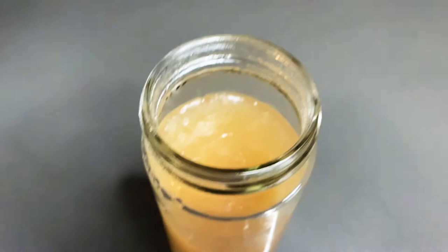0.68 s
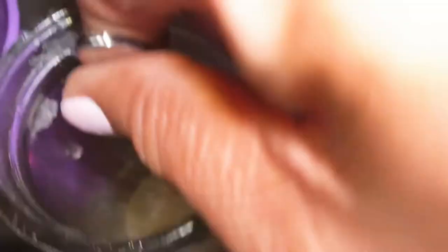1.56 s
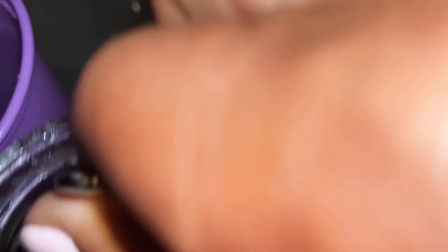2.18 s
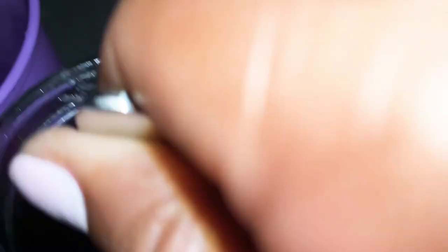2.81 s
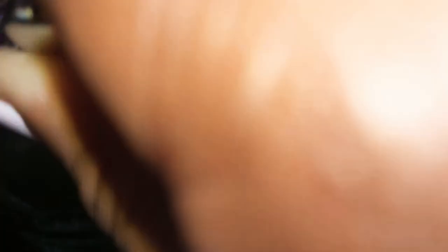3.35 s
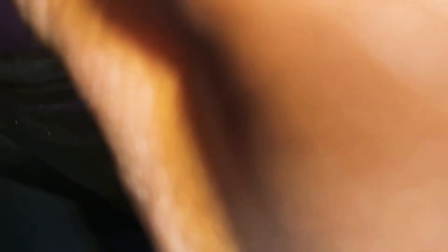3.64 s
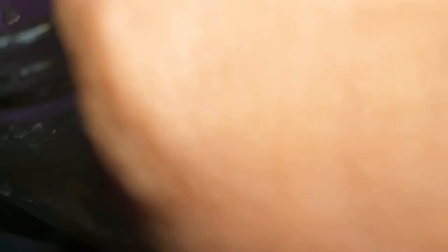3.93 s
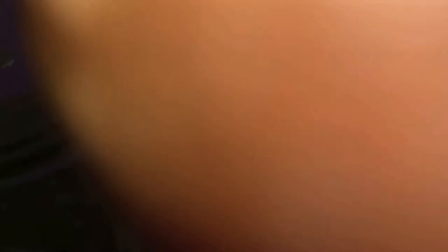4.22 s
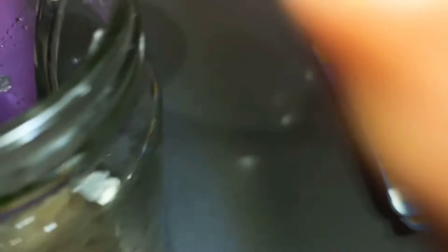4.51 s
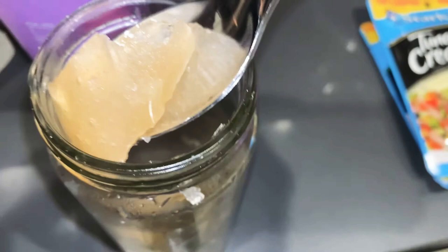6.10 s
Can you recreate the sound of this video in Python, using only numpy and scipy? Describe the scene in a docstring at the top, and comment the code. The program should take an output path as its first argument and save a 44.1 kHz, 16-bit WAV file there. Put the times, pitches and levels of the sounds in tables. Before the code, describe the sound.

Close up in a quiet kitchen, fingers brush a glass jar and a metal spoon clinks lightly against it. The spoon works through thick gel with dull, hollow knocks, short rubs and small sticky snaps. One low thump comes midway, followed by a brighter run of ringing clinks and gritty scrapes on the glass. It settles into a few faint taps over a low room rumble.

```python
"""A metal spoon scoops thick gel out of a glass jar, close by in a quiet kitchen.
Fingers brush the jar, then the spoon goes in with a few light clinks. Cushioned knocks and rubs
wake the hollow note of the air inside, and the gel crackles as it pulls apart. Midway comes one
soft low thump. From about 4 s bare metal clinks and scrapes on the glass, setting it ringing.
It ends with a few faint finger taps and a last snap of gel over the low rumble of the room."""
import sys
import numpy as np
from scipy import signal
from scipy.fft import rfft, irfft
from scipy.io import wavfile
from scipy.ndimage import uniform_filter1d, map_coordinates

SR = 44100
rng = np.random.default_rng(int(sys.argv[2]) if len(sys.argv) > 2 else 0)


def unload_wav(signal):
    """Save mono or channel-first audio to the path in sys.argv[1] as 16-bit WAV at rate SR, clipped to [-1, 1]."""
    wavfile.write(
        sys.argv[1],
        SR,
        np.round(np.clip(np.atleast_2d(signal).T, -1, 1) * 32767).astype(np.int16),
    )


N = 294806

# dull body tone of the jar: freq_hz, level_db
JAR_BODY = [(40, -27), (150, -19.5), (270, -15), (360, -10), (435, 4.5), (510, -1.5), (600, -0.5),
            (690, -8.5), (880, -7.5), (1100, -17.5), (1450, -18), (2100, -33), (3000, -36), (8000, -66.5)]
# lesser resonances of the air in the jar: freq_hz, width_hz, lift_db
AIR_PEAKS = [(585, 57, 1), (754, 27, 5), (828, 6.6, 3), (1190, 17, 8), (1443.5, 60, 1.5)]


def knocks(note_db=1, thud_db=2, air_t60_s=0.17):
    """A soft push swells the jar's hollow note, which dies away; a thud and a low bump come with it."""
    # cushioned knocks: start_s, note_level_db, thud_level_db, push_s, thud_tilt_db_per_octave
    hits = [(1.2115, -31, -34.5, 0.022, -.5), (1.2945, -40.5, -38.5, 0.031, -5),
            (1.419, -47, -33, 0.024, 5.5), (1.835, -20.5, -43.5, 0.034, -4), (1.874, -9.5, -23, 0.02, 1),
            (1.935, -17, -33, 0.0062, 3.5), (1.975, -20.5, -37.5, 0.0072, 3), (2.254, -27, -39, 0.016, -9),
            (2.291, -32.5, -32.5, 0.0053, -6.5), (2.435, -33.5, -36, 0.025, -11.5),
            (2.493, -31, -43, 0.0035, -11), (3.569, -28.5, -15.5, 0.0068, 2.5),
            (3.733, -27.5, -33.5, 0.013, -6.5), (3.847, -54, -47, 0.0091, 2.5),
            (4.0725, -39, -27, 0.011, 2), (4.101, -29, -21.5, 0.009, 1.5), (4.3736, -22, -24, 0.02, -1.5),
            (4.552, -30.5, -35, 0.018, .5), (4.6305, -17, -17.5, 0.023, 1), (4.867, -41, -46.5, 0.033, 2)]
    # the hollow note moves as spoon and hand fill the mouth of the jar: time_s, pitch_hz
    air_pitch = [(1.3, 450.7), (2.0, 431.2), (3.75, 440.4), (4.12, 453.8), (4.42, 443.3), (4.65, 420),
                 (4.9, 426)]
    # the low bump under each knock is stronger in the second half: time_s, bump_offset_db
    bump_curve = [(2.5, -21.5), (3.5, -15)]
    swell, thuds, t = np.zeros(N), np.zeros(N), np.arange(SR // 2) / SR
    bump = thump(start_hz=290, end_hz=50, glide_s=.014, peak_s=0.016)
    for s, air_db, db, push_s, tilt_db in hits:
        push = np.sin(np.pi * np.minimum(t / push_s, 1))
        envelope = signal.fftconvolve(push, np.exp(-np.log(1000) * t / air_t60_s))[:len(t)]
        add(swell, s, amp(air_db + note_db) * envelope / envelope.max())
        thud = crest(colour(burst(t, 0.94 * push_s), JAR_BODY, AIR_PEAKS, tilt_db))
        bump_db = db + np.interp(s, *np.transpose(bump_curve))
        add(thuds, s, amp(db + thud_db) * thud + amp(bump_db) * bump)
    hz = np.interp(np.arange(N) / SR, *np.transpose(air_pitch))
    return thuds + np.sqrt(2) * swell * np.sin(2 * np.pi * np.cumsum(hz) / SR)


def rubs(squeal_db=-2, crackle_db=-11):
    """Slips under the gel stir the air in the jar and make the spoon squeal, while the gel crackles."""
    # the spoon ploughing through gel: start_s, length_s, rub_level_db, squeal_level_db, mid_lift_db
    strokes = [(1.596, 0.093, -44.5, -64.5, -7.5), (1.804, 0.12, -29, -47, -5.5),
               (1.912, 0.055, -20, -37, 0), (2.237, 0.064, -33.5, -73, -14), (2.4, 0.13, -41.5, -76, -12.5),
               (2.977, 0.17, -52.5, -84, 1.5), (3.488, 0.06, -36.5, -55.5, 2),
               (3.557, 0.014, -18.5, -42.5, 14), (3.624, 0.11, -29.5, -46.5, 11)]
    # resonances of the squealing spoon: freq_hz, width_hz, lift_db
    squeal_peaks = [(7980, 380, 30.5), (8640, 270, 33), (9740, 340, 18.5), (13720, 260, 21),
                    (14900, 500, 8)]
    out, slips = 0, grains(2800, 1.1)
    squeal = unit(colour(grains(2700, 2), [(1000, -7.5), (6000, -2.5), (16000, -8.5)], squeal_peaks))
    wet_squeal = squeal + amp(crackle_db) * crackle()
    for start, length, low_db, thin_db, mid_db in strokes:
        peaks = [*AIR_PEAKS, (1230, 300, 1.2 * mid_db), (1850, 800, mid_db)]
        rub = unit(colour(slips, JAR_BODY, peaks, tilt_db=-1))
        # resistance builds until the gel gives way
        resistance = stroke(start, length, attack_s=0.022, swell_db=9.5, release_s=0.017)
        out = out + resistance * (amp(low_db) * rub + amp(thin_db + squeal_db) * wet_squeal)
    return out


def clinks(rattle=0.24, crack_s=0.0022):
    """Metal meets glass: each contact is a dry crack and a brief chatter that rings the jar."""
    # start_s, ring_db, crack_db, place (0 rim, 1 wall, more is deeper), chatter_scale_s, pitch_ratio
    contacts = [(0.8085, -38, -57, 0, 0.0043, .97), (0.8318, -37, -47, 1, 0.0016, 0.96),
                (0.995, -49.5, -55, 1.3, .0012, 1.04), (1.0176, -28, -48.5, 0, 0.0075, 1.028),
                (1.419, -34, -35.5, 0, .003, 0.97), (1.938, -42.5, -37, 1.2, 0.0094, 0.89),
                (1.96, -48, -46.5, -0.5, 0.008, 1.01), (2.2932, -42.5, -39, 1, 0.0014, 1.24),
                (2.675, -50, -48, .5, 0.003, 1), (4.0982, -13, -30.5, 1.1, 0.0032, 1.015),
                (4.2413, -39, -35.5, -0.2, 0.0037, 1.03), (4.254, -40.5, -43, 1, 0.013, .96),
                (4.3474, -30, -52.5, 3.5, 0.0036, 1.016), (4.381, -30, -42.5, 1.3, 0.0017, .975),
                (4.4245, -20.5, -45, 3.5, 0.003, 1.015), (4.451, -24, -35, 1.63, 0.0035, 1),
                (4.4933, -28, -41, 1.5, 0.00073, 1), (4.5537, -42, -16, 3.6, .0011, .97),
                (4.671, -42, -44.5, 1.5, 0.0014, 0.89), (4.7871, -54, -75, 1, 0.0018, 1.004),
                (5.0325, -63, -60, 1, 0.0014, 1.03)]
    # tone of the dry crack: freq_hz, level_db
    crack_eq = [(100, -15), (600, 10), (1500, -7), (2400, 3), (4000, 6.5), (6000, 3), (10000, -8.5),
                (14000, -13.5), (16000, -16)]
    out, t = np.zeros(N), np.arange(SR // 20) / SR
    for s, ring_db, crack_db, place, chatter_s, pitch in contacts:
        force = rattle * rng.standard_normal(len(t)) * np.exp(-(t / (1.5 * chatter_s)) ** 2)
        force[0] += 1
        spectrum = rfft(force)
        flattened = spectrum / abs(spectrum) ** .7  # a hard contact feeds all modes almost equally
        force = irfft(flattened, len(t)) * np.exp(-(t / (4 * chatter_s)) ** 2)
        ring = signal.fftconvolve(force, glass(place, tilt_db=2.5, pitch=pitch))
        add(out, s, amp(ring_db) * crest(ring))
        add(out, s, amp(crack_db) * crest(colour(burst(t, crack_s), crack_eq)))
    return out


def glass(place, tilt_db, pitch=1, detune=0.02, twin_db=-4, damping=1.3, max_t60_s=.05, linger_db=-36):
    """The glass rings in close pairs of modes, choked by spoon and gel; a faint uneven tail lingers."""
    # modes of the jar: freq_hz, rim_strike_db, wall_strike_db, t60_before_damping_s
    modes = [(2410, -22, -12, 0.42), (2705, 0, -2, 0.63), (2910, -23.5, -8, 0.065),
             (3220, -20, -12.5, 0.066), (4260, 2.5, -7, 0.022), (4550, -14, 1.5, 0.058),
             (4820, 6.5, -22, 0.035), (5710, -4.5, -23, 0.24), (6000, -10.5, -18, 0.053),
             (7050, -4, -38.5, 0.13), (7450, -20, -25.5, 0.1), (8130, -4.5, -21, 0.037),
             (8670, -7, -5, 0.027), (8420, -1.5, -28, 0.042), (9500, -9.5, -9, 0.012), (9930, 2, -5.5, .06),
             (10900, -14.5, -35, 0.019), (12000, -29, -18.5, 0.023), (13500, -26.5, -21, .04),
             (13100, -16, -31.5, 0.025), (13920, -14, -21, .035), (14850, -14, -28, .03)]
    t, out = np.arange(SR // 3) / SR, 0
    for hz, rim_db, wall_db, t60 in modes:
        db = rim_db + place * (wall_db - rim_db) + tilt_db * np.log2(hz / 5000)
        damped = np.exp(-np.log(1000) * t / min(t60 / damping, max_t60_s))
        linger_t60_s = .5 / np.sqrt(hz / 5000)  # lower modes hang on longer
        waver = np.interp(t, np.linspace(0, t[-1], num=60), rng.standard_normal(60))
        linger = amp(linger_db) * np.exp(-np.log(1000) * t / linger_t60_s) * waver
        twin_hz = hz * (1 + detune * rng.uniform(-0.69, 1))
        mode, twin = (np.sin(2 * np.pi * (f * pitch * t + rng.random())) for f in (hz, twin_hz))
        out = out + amp(db) * (damped + linger) * (mode + amp(twin_db) * twin)
    return out


def scrapes(ring_db=-3, grit_db=-5, spoon_db=-2, wander=0.0059):
    """The spoon's edge sticks and slips on bare glass; jar and spoon ring with a wavering pitch."""
    # drags along the glass: start_s, length_s, level_db, place (0 rim, 1 wall), grittiness_db
    drags = [(4.114, 0.086, -52, 0.82, 3.5), (4.193, 0.13, -46, 0.85, -7), (4.289, 0.049, -36.5, 0.76, 0.5),
             (4.353, 0.1, -45.5, 1, 6.5), (4.477, 0.033, -45, 0.5, 11.5), (4.557, 0.11, -56.5, 0.54, 10),
             (4.78, 0.023, -66, .9, 6), (4.829, .08, -59.5, 0.6, -11.5), (5.026, 0.073, -68.5, .3, 4.5),
             (5.132, 0.076, -65, 0.14, -1), (5.37, 0.11, -74, .4, -20.5)]
    # bending modes of the dragged spoon: freq_hz, width_hz, lift_db
    spoon_modes = [(1740, 440, 7), (2782, 130, 23.5), (2980, 360, 9), (4588, 160, 24.5), (5782, 300, 14),
                   (8720, 320, 20), (10070, 260, 20), (11910, 300, 12.5), (14040, 400, 20.5)]
    # tone of the spoon and of the grit: freq_hz, level_db
    spoon_eq = [(500, -20), (2500, -8), (4600, 0), (6800, -12), (9000, -4), (11000, -9), (14200, -8),
                (16000, -24)]
    grit_eq = [(300, -12), (1400, 0), (2400, 1), (3700, -5), (5600, -5), (7000, -13), (10000, -11),
               (16000, -28)]
    slips = grains(2000, 2.5) * flutter(rate_hz=110, depth_db=4)
    rim = unit(signal.oaconvolve(slips, glass(place=.1, tilt_db=-27))[:N])
    wall = unit(signal.oaconvolve(slips, glass(place=1, tilt_db=-10.5))[:N])
    spoon = unit(colour(slips, spoon_eq, spoon_modes))
    bend = wander * np.log(flutter(rate_hz=51, depth_db=11))  # changing pressure bends the modes
    warped_time = np.arange(N) + np.cumsum(bend)
    rim, wall, spoon = (map_coordinates(x, [warped_time], order=3) for x in (rim, wall, spoon))
    grit = unit(colour(slips, grit_eq, [(hz, width, .85 * lift) for hz, width, lift in spoon_modes]))
    out = 0
    for start, length, db, place, gritty_db in drags:
        jar = np.sqrt(1 - place) * rim + np.sqrt(place) * wall
        ring = amp(ring_db) * jar + amp(spoon_db) * spoon
        pressure = stroke(start, length, attack_s=0.045, swell_db=-0.5, release_s=.028)
        out = out + amp(db) * pressure * (ring + amp(grit_db + gritty_db) * grit)
    return out


def gel(crackle_db=-2, snap_db=-3, snap_s=0.0011):
    """Each pull crackles more until the gel tears, then less; some films snap singly."""
    # the gel pulling apart: tear_s, level_db, build_s, fade_s
    tears = [(1.12, -74.5, .1, .15), (2.18, -60, 0.041, .05), (2.26, -48, 0.012, 0.07),
             (2.52, -65.5, 0.071, 0.12), (2.7, -64.5, 0.039, 0.18), (2.805, -61.5, 0.053, 0.065),
             (3.189, -57, 0.065, 0.26), (3.78, -69.5, 0.08, 0.089), (4.05, -59, 0.059, 0.12)]
    # single films snapping: start_s, level_db
    snaps = [(1.1196, -52.5), (2.173, -41.5), (2.1886, -34), (2.252, -33), (2.36, -50), (2.5156, -50),
             (2.715, -47), (2.783, -46.5), (2.811, -36), (3.782, -46), (3.8147, -44.5), (4.007, -53.5),
             (4.0368, -43), (5.8458, -48)]
    # thin, bright tone of a snap: freq_hz, level_db
    snap_eq = [(1000, -39.5), (4000, -29.5), (7000, -6), (9500, 4), (13000, 3), (14800, -7), (16200, -11.5)]
    now, t, pull = np.arange(N) / SR, np.arange(SR // 40) / SR, 0
    for s, db, build_s, fade_s in tears:
        from_tear = np.maximum((s - now) / build_s, (now - s) / fade_s)
        pull = pull + amp(db) * np.exp(-np.minimum(from_tear, 20))
    out = amp(crackle_db) * pull * crackle()
    for s, db in snaps:
        add(out, s, amp(db + snap_db) * crest(colour(burst(t, snap_s), snap_eq)))
    return out


def crackle():
    """Countless thin wet films tear in uneven clumps."""
    # wet fizz of the gel: freq_hz, level_db
    fizz_eq = [(500, -34), (1500, -7.5), (4000, -11.5), (6500, -12.5), (9000, -6), (12500, -13.5),
               (14500, -7.5), (16000, -21)]
    return unit(colour(grains(5000, 4.5) * flutter(rate_hz=90, depth_db=4.5), fizz_eq))


def lone_thump(start_s=3.3735, level_db=-18):
    """One soft low thump whose pitch drops quickly."""
    out = np.zeros(N)
    add(out, start_s, amp(level_db) * thump(start_hz=245, end_hz=42, glide_s=.011, peak_s=.016))
    return out


def finger_taps(trim_db=-2, fade_s=0.021):
    """Fingers shift on the jar with faint dull taps."""
    # light touches: start_s, level_db
    taps = [(0.202, -49.5), (2.775, -46.5), (3.079, -43.5), (5.123, -46.5), (5.172, -51.5), (5.226, -51),
            (5.946, -59), (6.614, -53)]
    out, t = np.zeros(N), np.arange(SR // 5) / SR
    for s, db in taps:
        add(out, s, amp(db + trim_db) * crest(colour(burst(t, fade_s), JAR_BODY, tilt_db=-1.5)))
    return out


def finger_slides(trim_db=-2):
    """Skin brushes drily over the jar and the spoon handle at the start."""
    # sliding fingers: start_s, length_s, level_db
    slides = [(.03, 0.29, -66), (.35, 0.24, -77), (.74, .4, -68)]
    # tone of brushing skin: freq_hz, level_db
    skin_eq = [(200, -14), (750, 15), (1300, 9), (2300, -1.5), (3500, -14), (5000, -12.5),
               (9000, -16.5), (16000, -42)]
    envelope = sum(amp(db) * stroke(start, length, attack_s=0.069, swell_db=-4, release_s=0.06)
                   for start, length, db in slides)
    return amp(trim_db) * envelope * unit(colour(grains(2700, 1.7), skin_eq))


def stereo_image(x):
    """The close jar reaches left and right with different level and phase."""
    # left against right: freq_hz, level_db, phase_rad
    balance = [(100, 0, 0), (430, -3, -.65), (600, -1, -.45), (1300, -1.5, -.75), (1700, 0, -.85),
               (2200, 2, -1.3), (2900, 3, -2.1), (4500, 0, -.6), (5700, -1, -1.6), (7100, -1, -2),
               (8600, -1.5, -1.8), (10000, -.5, -1.2), (12000, 0, -.35), (15000, 0, -.2)]
    hz, balance = np.fft.rfftfreq(N, 1 / SR), np.array(balance)
    level_db, phase_rad = read(balance[:, :2], hz), read(balance[:, ::2], hz)
    left = amp(level_db / 2) * np.exp(.5j * phase_rad)
    return irfft(rfft(x) * np.array([left, 1 / left]), N)


def kitchen_reverb(x, onset_s=0.0024):
    """A small kitchen: a diffuse tail for each side, every band dying at its own speed."""
    # decay of the room: freq_hz, t60_s
    decay_times = [(150, 1), (500, 0.47), (1500, .4), (5000, 0.075), (15000, 0.45)]
    hz, t, bands = signal.stft(rng.standard_normal((2, SR // 2)), SR, nperseg=256)
    decay = np.exp(-np.log(1000) * t / read(decay_times, hz)[:, None])
    tail = signal.istft(bands * decay * (1 - np.exp(-t / onset_s)), SR, nperseg=256)[1]
    return signal.fftconvolve(x[None], tail / np.linalg.norm(tail[0]), axes=1)[:, :N]


def room_tone(width=0.17, level_db=-59):
    """Low room rumble, nearly the same on both sides and a little weaker at first."""
    # tone of the rumble: freq_hz, level_db
    rumble_eq = [(25, -20.5), (50, 0), (75, -5.5), (115, 1.5), (160, -14), (280, -15.5), (400, -15.5),
                 (600, -25), (1000, -33.5), (2000, -41.5), (4000, -46.5), (9000, -53), (16000, -60)]
    mid, side = (unit(colour(rng.standard_normal(N), rumble_eq)) for _ in range(2))
    rise = amp(np.interp(np.arange(N) / SR, [.7, 1.1], [-3, 0]))
    return rise * amp(level_db) * np.array([mid + width * side, mid - width * side])


def thump(start_hz, end_hz, glide_s, peak_s):
    """A soft low pulse whose pitch drops quickly."""
    t = np.arange(SR // 2) / SR
    hz = end_hz + (start_hz - end_hz) * np.exp(-t / glide_s)
    return -(t / peak_s * np.exp(1 - t / peak_s)) ** 2 * np.sin(2 * np.pi * np.cumsum(hz) / SR)


def burst(t, fade_s):
    """White noise that starts at once and dies away."""
    return rng.standard_normal(len(t)) * np.exp(-t / fade_s)


def grains(per_s, spread_db):
    """Random tiny slips, most of them small and a few large."""
    size = amp(spread_db * np.minimum(rng.exponential(1, N), 4))
    return size * rng.choice([-1, 1], N) * (rng.random(N) < per_s / SR)


def flutter(rate_hz, depth_db):
    """An uneven gain that slides to a new random value many times a second."""
    steps = rng.standard_normal(4000)
    return amp(depth_db * np.interp(np.arange(N) / SR * rate_hz, np.arange(len(steps)), steps))


def stroke(start, length, attack_s, swell_db, release_s):
    """Envelope of one stroke: it sets in, changes by swell_db over its length, and dies away."""
    t = np.arange(N) / SR - start
    swell = amp(swell_db * (np.clip(t / length, 0, 1) - 1))
    release = np.exp(-np.clip((t - length) / release_s, 0, 20))
    return np.clip(t / attack_s, 0, 1) * swell * release


def colour(x, points, peaks=(), tilt_db=0, size=4096):
    """Minimum-phase EQ from a curve, resonant peaks and a tilt per octave from 500 to 4000 Hz."""
    hz = abs(np.fft.fftfreq(size, 1 / SR))
    db = read(points, hz) + tilt_db * np.log2(np.clip(hz, 500, 4000) / 500)
    db = db + sum(lift / (1 + (2 * (hz - f) / width) ** 2) for f, width, lift in peaks)
    taps = np.fft.ifft(np.exp(signal.hilbert(np.log(amp(db))).conj())).real
    return signal.oaconvolve(x, taps[:size // 2])[:len(x)]


def read(points, hz):
    """Reads a curve on a log-frequency axis."""
    f, value = np.transpose(points)
    return np.interp(np.log(hz + 1), np.log(f + 1), value)


def amp(db):
    """Decibels to gain."""
    return 10 ** (np.asarray(db) / 20)


def unit(x):
    """Scales to rms 1."""
    return x / np.sqrt(np.mean(x ** 2) + 1e-20)


def crest(x, size=176):
    """Scales a hit so that its loudest few milliseconds have rms 1."""
    return x / np.sqrt(uniform_filter1d(x ** 2, size).max() + 1e-20)


def add(mix, s, sound):
    """Adds a sound into the mix at time s."""
    part = mix[round(s * SR):][:len(sound)]
    part += sound[:len(part)]


def scene(soft_send_db=-20, glass_send_db=-17):
    """Spoon, jar and gel, close up; the ringing glass sends more into the room than the soft sounds."""
    bright = clinks() + scrapes()
    soft = knocks() + rubs() + gel() + finger_taps() + finger_slides()
    send = amp(glass_send_db) * bright + amp(soft_send_db) * soft
    return stereo_image(bright + soft + lone_thump()) + kitchen_reverb(send) + room_tone()


def record(dry):
    """A steep high cut at 16 kHz."""
    high_cut = signal.firwin(511, 16000, window=("kaiser", 9), fs=SR)
    return signal.oaconvolve(dry, high_cut[None], "same")


dry = scene()
out = record(dry)
unload_wav(out)
```